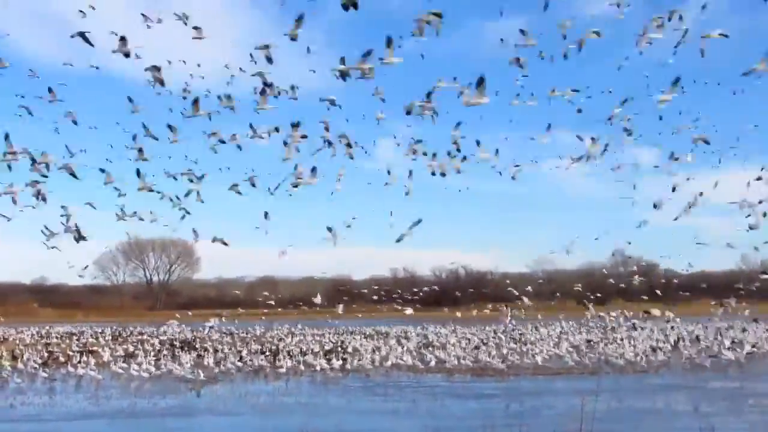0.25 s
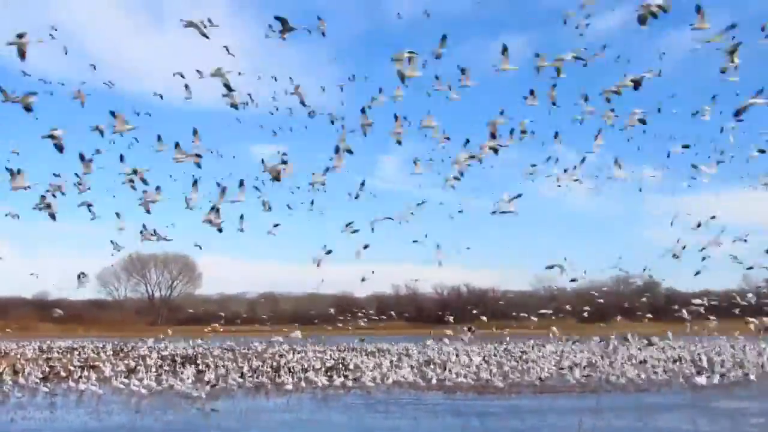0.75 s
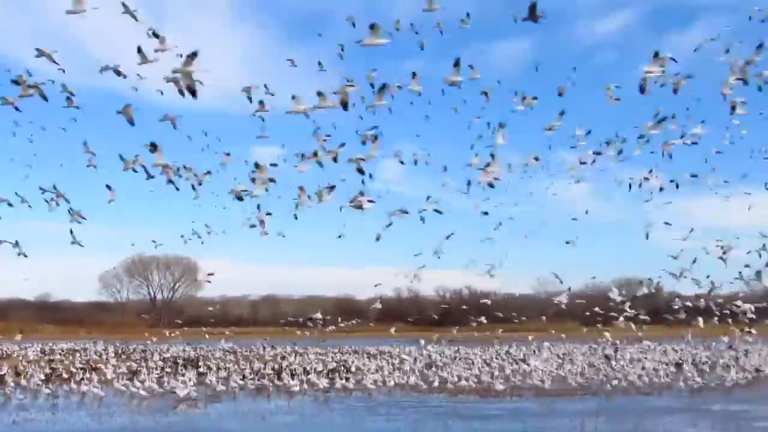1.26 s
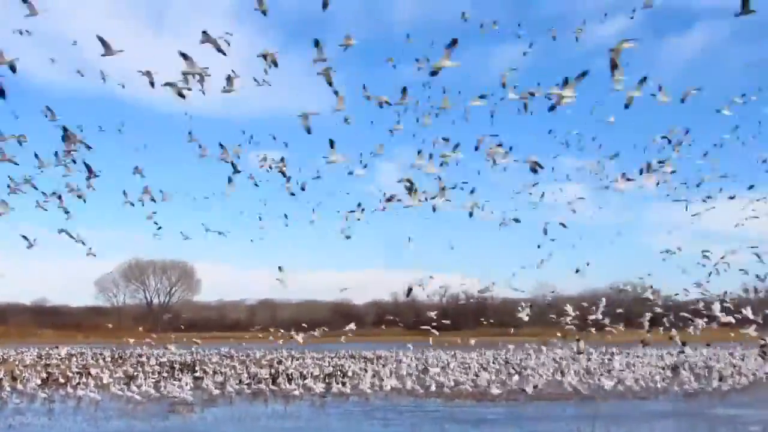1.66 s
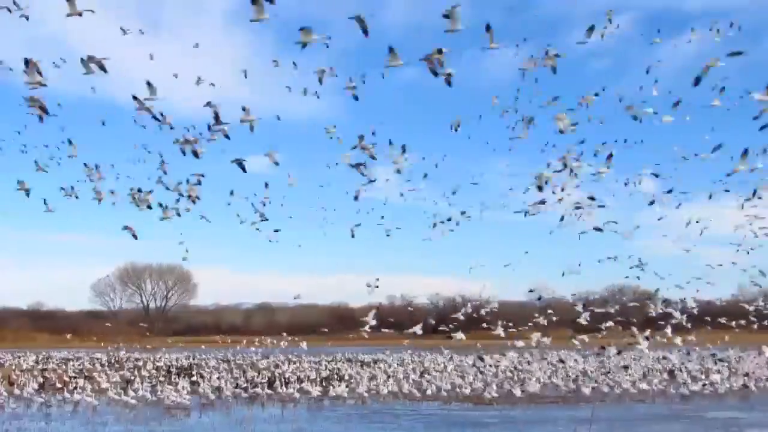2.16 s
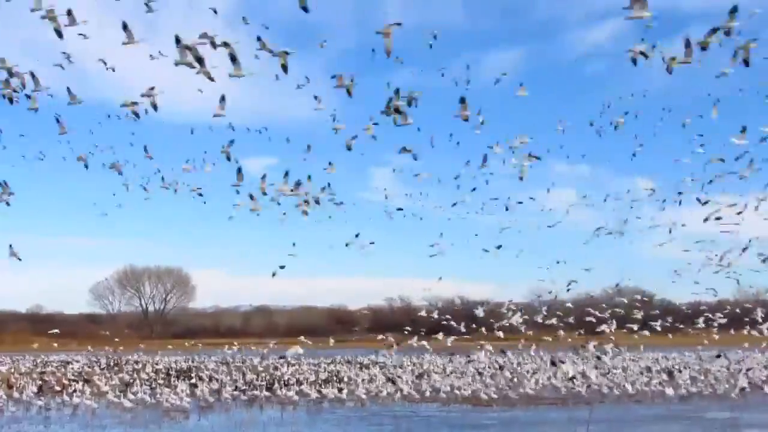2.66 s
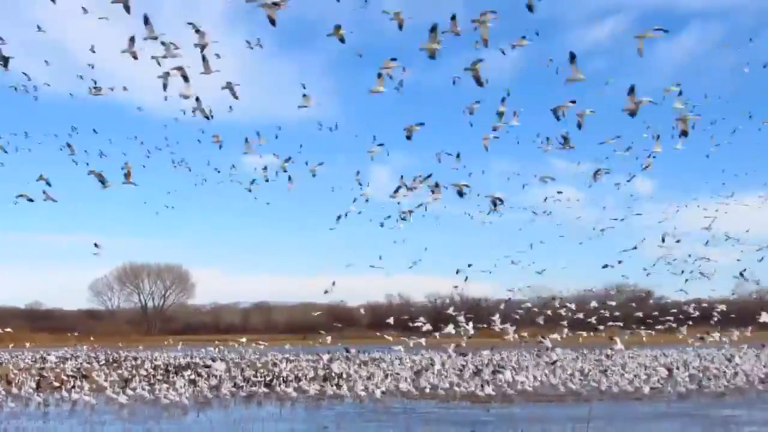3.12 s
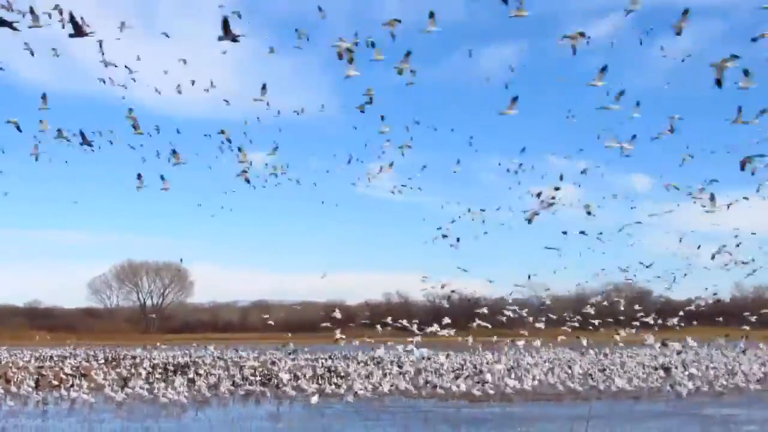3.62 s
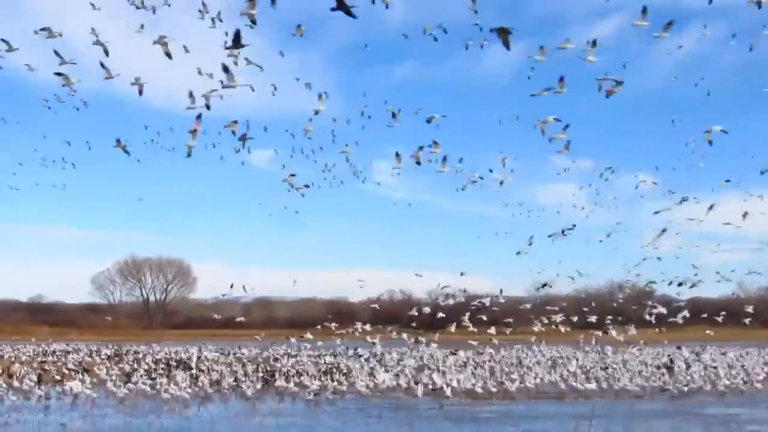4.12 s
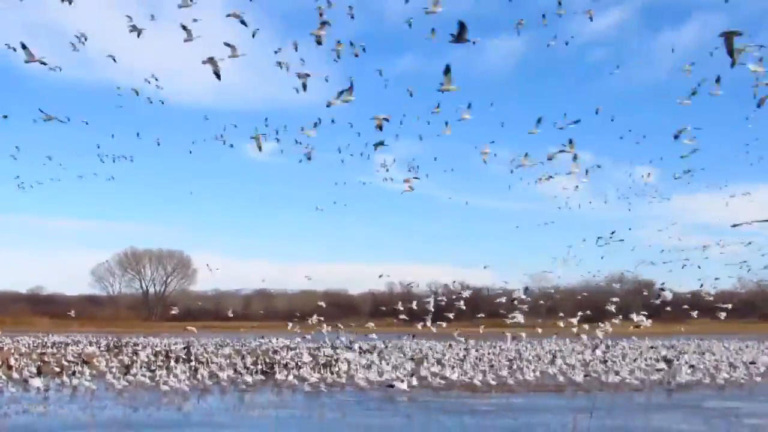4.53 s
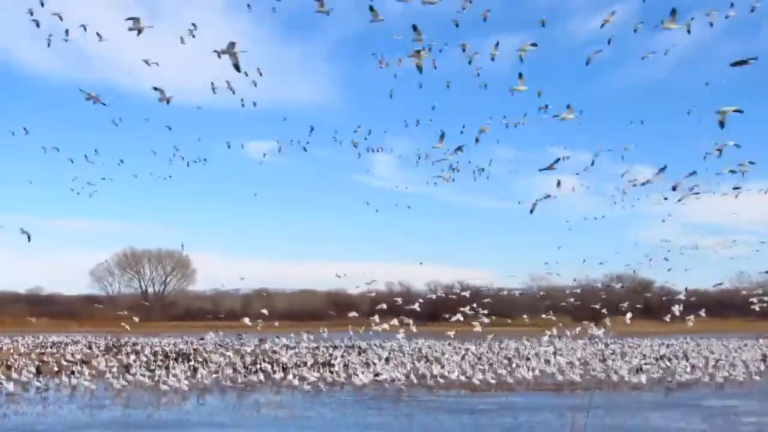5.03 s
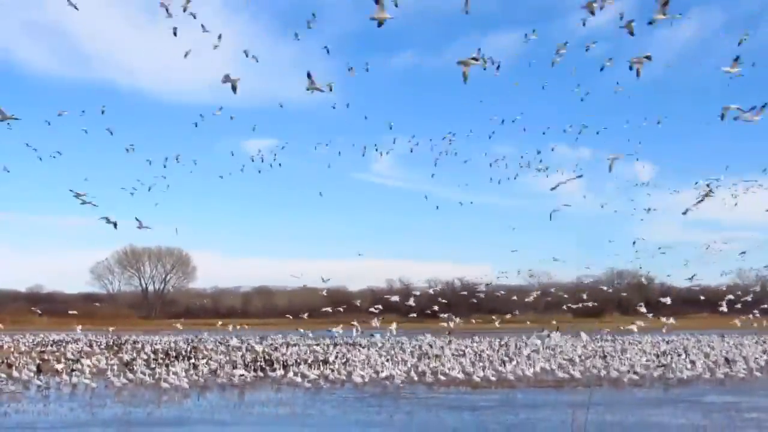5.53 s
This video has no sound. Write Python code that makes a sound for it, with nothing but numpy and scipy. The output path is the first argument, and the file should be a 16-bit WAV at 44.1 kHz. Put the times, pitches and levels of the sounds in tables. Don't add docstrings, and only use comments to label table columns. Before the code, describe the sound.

A huge flock of geese calls over a shallow pond. Overlapping short, nasal honks form an unbroken babble, loudest and brightest at the start, thinning near 1.7 seconds, then swelling again before 3 seconds. Closer birds yelp clearly above it, with a few hoarse squawks. Fine airy hiss from wings and spray sits on top. Low wind rumble and soft thumps strike the microphone, clustering around 1.6 seconds. Open air, almost no echo.

```python
import sys
import numpy as np
from scipy import signal
from scipy.fft import rfft, irfft, next_fast_len
from scipy.io import wavfile
from scipy.ndimage import uniform_filter1d

SR = 44100
rng = np.random.default_rng(int(sys.argv[2]) if len(sys.argv) > 2 else 0)


def boost_factor(decibels):
    exponent = np.asarray(decibels, float) / 20
    return 10 ** exponent


def store_pcm(level_fs):
    pcm = np.round(np.clip(level_fs, -1, 1) * 32767).astype(np.int16)
    wavfile.write(sys.argv[1], SR, np.atleast_2d(pcm).T)


N = 254898

# (time [s], level [dB])
WIND_LEVEL = [
    (0.0, -42),
    (1.06, -39.5),
    (1.38, -45),
    (1.59, -36.5),
    (1.83, -45),
    (3.23, -39.5),
    (3.62, -43),
    (4.65, -38.5),
    (5.34, -38),
    (5.78, -43),
]
# (frequency [Hz], density [dB per Hz])
WIND_SPECTRUM = [(12, -36), (20, -13), (60, 1.5), (129, 0), (263, -1.5), (433, -13), (600, -4), (780, -32),
                 (1320, -120)]
# (time [s], peak level [dB], frequency [Hz])
WIND_PUFFS = [(0.792, -26.5, 108), (0.807, -24, 191), (1.201, -18, 141), (1.412, -22.5, 199),
              (1.426, -23.5, 194), (1.471, -25, 109), (1.546, -27, 95), (1.563, -22.5, 161),
              (1.582, -28, 111), (1.599, -19, 255), (1.617, -17, 218), (1.646, -20.5, 171),
              (1.689, -31, 153), (1.753, -26, 124), (2.448, -28.5, 95), (3.134, -23, 147),
              (3.173, -37, 144), (3.459, -20.0, 115), (4.183, -28, 113), (4.286, -32, 121),
              (4.599, -31, 106), (5.006, -26.5, 137), (5.112, -29, 121), (5.24, -25, 98),
              (5.262, -25.5, 120), (5.289, -25.5, 147), (5.334, -26, 126), (5.351, -22, 130),
              (5.553, -18, 131), (5.7, -28.2, 154)]
# (time [s], level [dB], nearness as extra treble [dB])
CROWD_SURGES = [(0.0, -23, 6.5), (0.08, -25, 11), (0.53, -27.5, 1.5), (0.56, -24.5, 8), (0.84, -29, 4),
                (0.98, -25, 5), (1.26, -30, 3), (1.3, -28.5, 2), (1.69, -35.5, 2.5), (1.87, -32, 2),
                (2.75, -26, 4.5), (2.82, -28, -0.5), (3.35, -25, 3.5), (3.56, -28.5, 1), (3.64, -28, 2),
                (5.52, -26, 1.5), (5.6, -31.5, -4), (5.78, -29, 6)]
# (frequency [Hz], density [dB per Hz])
FAR_FLOCK_SPECTRUM = [(210, -51), (350, -13.5), (439, -18), (577, -7.5), (681, -11.5), (894, 2.5),
                      (1090, 0.5), (1320, 1), (1770, -3.5), (2220, -16.5), (3000, -26), (4380, -25),
                      (13000, -43)]
# (frequency [Hz], level [dB])
HISS_SPECTRUM = [(3000, -28), (5000, -7), (9000, -4.5), (13000, -29), (14200, -40)]
# (frequency [Hz], level [dB])
TREBLE_PART = [(2200, -58), (3000, -5.5)]
# (frequency [Hz], level [dB])
THROAT_RESONANCE = [(400, -16), (650, -14.5), (900, -2), (1300, 3), (1800, 4.5), (2100, -2.5), (2600, -9.5),
                    (3100, -18), (4500, -15), (6500, -28), (10000, -36.5), (14500, -33)]
# (frequency [Hz], level [dB])
BEAK_RADIATION = [(2600, 1), (3200, -3), (4400, 1), (5400, 1), (6200, 0), (7500, 1), (9500, -2),
                  (11500, -10), (14500, -26)]
# (time [s], length
# [s], frequency [Hz], level [dB])
RISING_LINES = [(0.005, 0.085, 1813, -26.5), (0.099, 0.044, 1840, -22.5), (0.264, 0.025, 1430, -28),
                (0.321, 0.074, 1760, -27), (0.609, 0.063, 1826, -28), (0.913, 0.043, 883, -33.5),
                (0.929, 0.067, 1570, -29.5), (0.977, 0.029, 1900, -26.5), (1.15, 0.076, 1886, -35.5),
                (1.283, 0.021, 1483, -30), (1.287, 0.07, 1730, -30.5), (1.322, 0.061, 1632, -37),
                (1.329, 0.033, 3590, -41.5), (1.331, 0.034, 1386, -32), (2.52, 0.021, 1750, -29),
                (2.569, 0.031, 1027, -33), (2.728, 0.042, 2007, -37), (3.053, 0.032, 990, -31.5),
                (3.089, 0.041, 1250, -31), (3.333, 0.035, 1964, -29.5), (3.613, 0.072, 932, -33),
                (3.638, 0.061, 1845, -28.5), (3.888, 0.036, 1297, -27), (3.956, 0.027, 1420, -35),
                (4.141, 0.019, 888, -35), (4.829, 0.04, 1747, -31), (5.128, 0.022, 1280, -30),
                (5.153, 0.074, 843, -36), (5.657, 0.046, 1350, -32.5), (5.702, 0.027, 1570, -36)]
# (time [s], length [s], frequency [Hz], level [dB])
FALLING_LINES = [(0.535, 0.052, 1011, -30), (0.655, 0.038, 1910, -34), (0.993, 0.041, 1956, -27.5),
                 (1.043, 0.033, 1839, -29.5), (1.295, 0.043, 3150, -44.5), (1.365, 0.028, 1236, -32),
                 (1.465, 0.084, 1299, -35.5), (2.277, 0.029, 1298, -31), (2.629, 0.027, 1611, -27.5),
                 (2.635, 0.042, 1844, -33), (2.724, 0.047, 2094, -32.5), (3.365, 0.048, 1820, -26.5),
                 (3.956, 0.032, 1170, -28), (3.971, 0.024, 3390, -39), (4.909, 0.057, 1122, -30),
                 (4.958, 0.023, 1360, -36), (5.166, 0.038, 1360, -33)]
# (time [s], length [s], pitch [Hz], middle level [dB], top level [dB])
HOARSE_SQUAWKS = [
    (1.369, 0.027, 582, -53, -53.5),
    (2.215, 0.11, 451, -61, -62),
    (2.552, .05, 454, -73, -55.5),
    (2.638, 0.048, 421, -46.5, -63),
    (2.724, 0.063, 440.6, -45.5, -61),
    (3.267, 0.08, 460, -52, -58),
    (4.53, 0.02, 481, -45.5, -54),
    (5.152, 0.091, 460, -51.5, -57.5),
]
# (time [s], length [s], start pitch [Hz], end pitch [Hz], level [dB])
FACING_HONKS = [(0.127, 0.073, 896, 890, -45), (0.192, 0.026, 900, 1025, -39),
                (0.212, 0.034, 1025, 1040, -44), (0.245, 0.037, 502, 504, -45),
                (0.274, 0.048, 1010, 945, -40), (0.493, 0.038, 930, 1001, -47),
                (0.568, 0.044, 963, 918, -40), (0.684, 0.05, 893, 889, -51), (0.701, 0.038, 893, 876, -52),
                (1.959, 0.038, 930, 882, -54), (0.93, 0.062, 782, 797, -53), (0.979, 0.045, 922, 962, -52),
                (2.506, 0.038, 988, 986, -52), (2.519, 0.044, 860, 884, -52), (3.238, 0.056, 887, 879, -52),
                (3.514, 0.044, 866, 820, -51), (3.62, 0.056, 859, 932, -49), (3.704, 0.05, 914, 899, -48),
                (4.371, 0.05, 838, 893, -51), (4.537, 0.05, 1040, 1085, -48), (4.543, 0.05, 873, 932, -48),
                (4.592, 0.044, 885, 831, -44), (5.217, 0.044, 847, 866, -44), (5.261, 0.062, 930, 933, -52)]
# (time [s], length [s], start pitch [Hz], end pitch [Hz], level [dB])
TURNED_HONKS = [(0.028, 0.038, 974, 977, -47), (0.052, 0.077, 794, 805, -40), (0.321, 0.084, 882, 892, -47),
                (0.542, 0.038, 1021, 1026, -46), (0.565, 0.068, 974, 1031, -48),
                (0.616, 0.038, 1026, 908, -48), (0.718, 0.038, 861, 804, -45),
                (1.099, 0.044, 828, 863, -49), (0.786, 0.062, 694, 706, -48), (2.212, 0.05, 821, 835, -46),
                (2.297, 0.038, 852, 839, -50), (2.467, 0.038, 966, 967, -51), (2.56, 0.074, 898, 921, -51),
                (2.668, 0.046, 860, 872, -38), (2.704, 0.024, 875, 930, -43), (3.051, 0.038, 869, 870, -48),
                (3.365, 0.044, 923, 893, -48), (3.48, 0.038, 923, 915, -51), (3.636, 0.076, 896, 980, -50),
                (3.707, 0.052, 897, 969, -46), (4.218, 0.089, 872, 886, -44), (4.487, 0.05, 991, 1008, -53),
                (4.916, 0.044, 850, 800, -50), (5.059, 0.038, 846, 848, -48)]
# (frequency [Hz], level [dB])
MICROPHONE = [(12000, 0), (13500, 1), (14500, 1)]

FACING_TOP_DB, TURNED_TOP_DB = -4.5, -17.5
GLIDE_UP, GLIDE_DOWN = 0.039, -0.055
RASP_ROUGH = 0.0875
DUCK_FROM_DB, DUCK_SHARE, DUCK_RECOVER_S = -27, 0.24, 0.11


def evened(x):
    return x / np.sqrt(np.mean(x ** 2) + 1e-20)


def read(points, hz):
    f, value = np.transpose(points)
    return np.interp(np.log(hz + 1), np.log(f + 1), value)


def add(mix, s, sound):
    part = mix[max(round(s * SR), 0):][:len(sound)]
    part += sound[:len(part)]


def coloured(x, points):
    size = next_fast_len(len(x))
    gain = boost_factor(read(points, np.fft.rfftfreq(size, 1 / SR)))
    return irfft(rfft(x, size) * gain, size)[:len(x)]


def curve(rows, column):
    rows = np.array(rows)
    return np.interp(np.arange(N) / SR, rows[:, 0], rows[:, column])


def wobble(size, width):
    smooth = uniform_filter1d(rng.standard_normal(size), width)
    return evened(uniform_filter1d(smooth, width))


def wind():
    out = evened(coloured(rng.standard_normal(N), WIND_SPECTRUM))
    out *= boost_factor(curve(WIND_LEVEL, 1) + 2.0 * wobble(N, width=400))
    t = np.arange(-1500, 1500) / SR
    for s, db, hz in WIND_PUFFS:
        bell = np.exp(-(t * hz / 0.5) ** 2)
        add(out, s - 1500 / SR, -boost_factor(db) * np.cos(2 * np.pi * hz * t) * bell)
    return out


def duck_db():
    out, t = np.zeros(N), np.arange(SR) / SR
    for s, db, _ in WIND_PUFFS:
        depth_db = DUCK_SHARE * max(db - DUCK_FROM_DB, 0)
        add(out, s, -depth_db * np.exp(-t / DUCK_RECOVER_S))
    return uniform_filter1d(out, size=400)


def wing_hiss(level_db):
    hiss = evened(coloured(rng.standard_normal(N), HISS_SPECTRUM))
    return hiss * boost_factor(-28 + uniform_filter1d(level_db, size=9000) + 2.0 * wobble(N, width=500))


def crowd(count=680):
    when, voice, spread, glide, size, length, hoarse = rng.random((count, 7)).T[:, :, None]
    u = np.arange(3600) / (3600 * (0.4 + 0.597 * length))
    pitch = np.where(voice < .35, 690, 900) * (1 + .3 * (spread - .5))
    hz = pitch * (1 + 0.1642 * (glide - .4) * (u - .5) - 0.247 * (u - .5) ** 2)
    jitter = .25 * hoarse ** 3 * uniform_filter1d(rng.standard_normal(u.shape), 30)
    half_phase = np.pi * (np.cumsum(hz * (1 + jitter), 1) / SR + when * 97)
    top = np.floor(13000 / pitch)
    pulses = np.sin((2 * top + 1) * half_phase) / (2 * np.sin(half_phase) + 1e-9) - .5
    swell = np.sqrt(np.sin(np.pi * np.minimum(u, 1)) + 1e-12)
    calls = pulses * swell * boost_factor(12 * size)
    out = np.zeros(N + 3600)
    slots = (np.arange(count) + when[:, 0]) / count * (N + 3000) / SR
    for s, call in zip(slots, calls):
        add(out, s, call)
    return evened(coloured(out[3600:], THROAT_RESONANCE))


def flock():
    wash = evened(coloured(rng.standard_normal(N), FAR_FLOCK_SPECTRUM))
    both = boost_factor(-2.5) * crowd() + boost_factor(-4) * wash
    treble = coloured(both, TREBLE_PART)
    level_db = curve(CROWD_SURGES, 1) + duck_db()
    nearness = boost_factor(curve(CROWD_SURGES, 2)) - 1
    return boost_factor(level_db) * (both + nearness * treble) + wing_hiss(level_db)


def single_line(length, mid_hz, db, glide):
    u = np.linspace(0, 1, int((length + 0.02) * SR))
    arch = 0.037 * (np.sin(np.pi * u) - .7)
    hz = mid_hz * (1 + glide * (u - .5) + arch + 0.027 * wobble(len(u), width=100))
    tone = np.sin(2 * np.pi * np.cumsum(hz) / SR)
    return np.sqrt(2) * boost_factor(db) * tone * signal.windows.tukey(len(u), .6)


def honk(length, hz0, hz1, mid_db, top_db, rough):
    u = np.linspace(-.01, length + 0.0075, int((length + 0.0178) * SR)) / length
    inside = np.clip(u, 0, 1)
    arch = 1 + 0.01 * (np.sin(np.pi * inside) - .7)
    hz = (hz0 + (hz1 - hz0) * inside) * arch
    turns = np.cumsum(hz * (1 + rough * wobble(len(u), width=40))) / SR
    k = np.arange(1, int(14500 / hz0) + 1)[:, None]
    start, speed = rng.random((2, 64, 1))[:, :len(k)]
    flicker_db = 2.5 * np.sin(2 * np.pi * (start + speed * u))
    low = boost_factor(mid_db + 8 + read(THROAT_RESONANCE, k * hz0) + flicker_db)
    low = low * signal.windows.tukey(len(u), .6)
    aimed_db = read([(4900, mid_db), (6800, top_db)], k * hz0)
    high = boost_factor(aimed_db + read(BEAK_RADIATION, k * hz0) + flicker_db)
    high = high * np.sin(np.pi * inside) ** .5
    partials = np.where(k * hz0 < 2300, low, high) * np.cos(2 * np.pi * k * turns + k * k)
    return np.sqrt(2) * partials.sum(0)


def near_geese():
    out = np.zeros(N)
    for rows, glide in ((RISING_LINES, GLIDE_UP), (FALLING_LINES, GLIDE_DOWN)):
        for s, length, mid_hz, db in rows:
            add(out, s - .01, single_line(length, mid_hz, db, glide))
    for s, length, hz, mid_db, top_db in HOARSE_SQUAWKS:
        add(out, s - .01, honk(length, hz, hz, mid_db, top_db, RASP_ROUGH))
    for rows, top_db in ((FACING_HONKS, FACING_TOP_DB), (TURNED_HONKS, TURNED_TOP_DB)):
        for s, length, hz0, hz1, db in rows:
            add(out, s - .01, honk(length, hz0, hz1, db, db + top_db, .003))
    return out


def scene():
    geese = near_geese()
    geese[300:] += boost_factor(-14) * geese[:-300]
    return (geese + flock() + wind())[None]


def top_cut(x):
    return signal.sosfilt(signal.butter(12, 14500, fs=SR, output="sos"), x)


def record(dry):
    heard = coloured(dry[0], MICROPHONE)[None]
    return top_cut(heard)


dry = scene()
out = record(dry)
store_pcm(out)
```